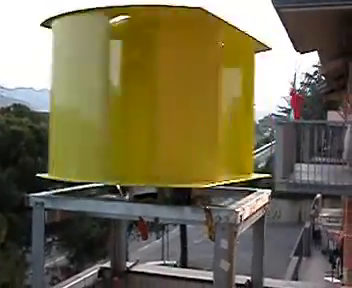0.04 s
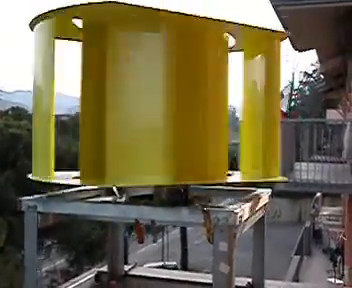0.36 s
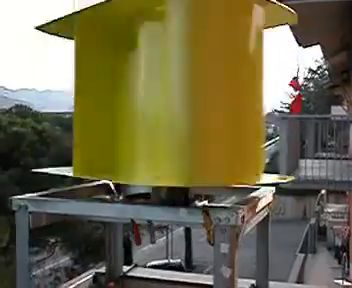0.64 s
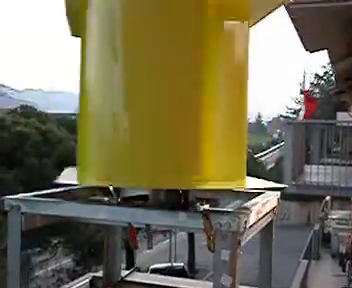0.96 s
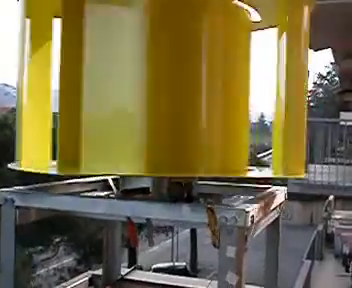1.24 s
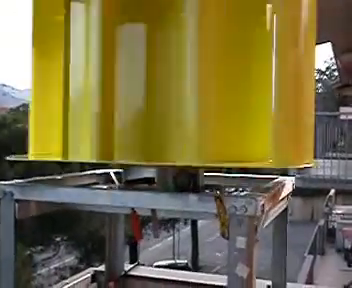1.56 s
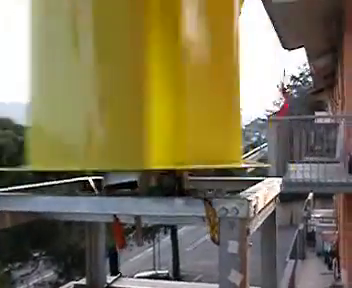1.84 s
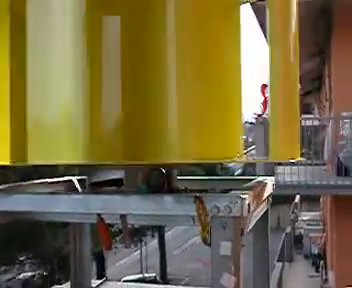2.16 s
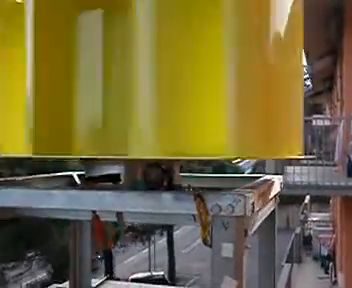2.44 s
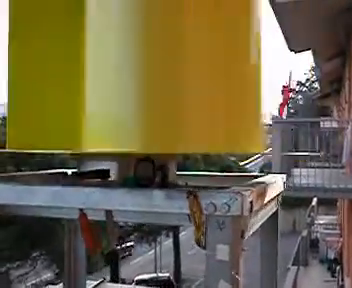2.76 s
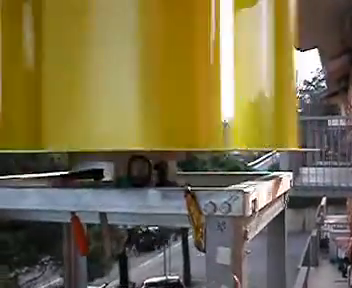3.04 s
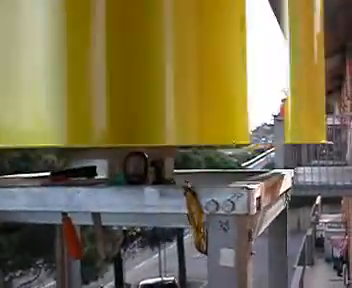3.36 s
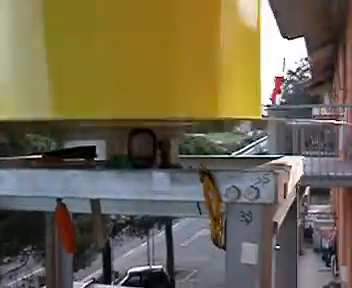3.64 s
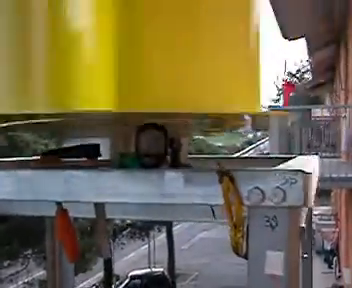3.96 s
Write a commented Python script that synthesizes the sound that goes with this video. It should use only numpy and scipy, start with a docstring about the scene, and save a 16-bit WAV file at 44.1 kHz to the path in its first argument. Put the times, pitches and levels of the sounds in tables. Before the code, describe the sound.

Wind buffets the microphone in rough bumps and slaps over a rush of road traffic.

```python
"""Air and tyres rush, heard through a small camera by a vertical turbine on a balcony above a road.
Two engines hum and fade, and a bird chirps faintly three times. Wind flutters on the microphone
and hits it in rough bumps and sharp slaps, which overload the narrow-band recorder."""
import sys
import numpy as np
from scipy.fft import rfft, irfft, next_fast_len
from scipy.io import wavfile
from scipy.ndimage import map_coordinates

SR = 44100
rng = np.random.default_rng(int(sys.argv[2]) if len(sys.argv) > 2 else 0)


def inscribe(sig):
    """Save sig as 16-bit PCM at rate SR to the path in sys.argv[1].

    A 1-D sig is mono; a 2-D sig holds one channel per row.
    Samples are clipped to [-1, 1] before scaling.
    """
    pcm = np.round(np.clip(np.atleast_2d(sig).T, -1, 1) * 32767)
    wavfile.write(sys.argv[1], SR, pcm.astype(np.int16))


N = 176400

# road noise [t/s, tyre roar level/dB, rush level/dB, roar centre f/Hz]
ROAD_TRACK = [(0, -28.5, -17.5, 1080), (.55, -24, -16, 1158), (.72, -22.5, -19, 1077),
              (.95, -20.5, -18.5, 1165), (1.4, -21, -18, 1111), (1.78, -20, -20, 1083),
              (1.92, -26.5, -24, 1053), (2.2, -26, -25, 1016), (2.7, -26, -26, 1090),
              (3.1, -29.5, -27.5, 1116), (3.45, -49, -32, 1055), (4, -42.5, -37, 1051)]
# traffic and air rush spectrum [f/Hz, relative density/dB]
RUSH_SPECTRUM = [(25, -20.5), (60, -10.5), (130, -5.5), (250, -10), (420, -1.5), (620, -6), (830, 0.5),
                 (1250, -1.5), (1450, -7.5), (1650, -8), (1900, -7), (2150, -10.5), (2600, -11.5),
                 (3200, -17.5), (3900, -19.5)]
# far traffic spectrum [f/Hz, relative density/dB]
RUMBLE_SPECTRUM = [(25, -22), (45, -3.5), (65, 3), (100, -6), (200, -24)]
# first engine's fade [t/s, level/dB]
ENGINE_FADE = [(0, -1), (.55, -0.5), (.8, -9), (1.4, -13), (2, -31.5), (4, -30)]
# its harmonics [order, relative level/dB]
ENGINE_ORDERS = [(1, -45.5), (2, -34), (4, -36), (5, -37), (6, -36.5), (7, -37.5)]
# its exhaust and whine [f/Hz, width/Hz, relative level/dB]
ENGINE_NOISE_BANDS = [(413.2, 210, -26), (1780, 200, -27)]
# second engine's note [t/s, f/Hz, level/dB]
DRONE_TRACK = [(0, 69.6, -36), (.3, 70.5, -38), (.6, 67.6, -43.5), (1, 61.6, -43.5), (1.6, 60, -46),
               (2.2, 60.3, -61.5)]
# light wind between bumps [t/s, level/dB]
BREEZE_TRACK = [(0, -33), (.55, -39), (.8, -22), (1.25, -25.5), (1.5, -30.5), (2, -33), (2.25, -34.5),
                (2.7, -30), (2.95, -29), (3.3, -24.5), (3.53, -32.5), (3.75, -26.5), (4, -33)]
# wind bumps on the microphone [centre t/s, length/s, thump level/dB, buffet level/dB]
WIND_BUMPS = [(0.124, 0.088, -21.5, -22), (0.653, 0.022, -18, -27), (0.693, 0.018, -10, -15.5),
              (0.772, 0.022, -17, -13), (0.846, 0.012, -20.5, -11), (0.903, 0.027, -24.5, -14.5),
              (1.083, 0.018, -21.5, -16), (1.28, 0.012, -21, -17.5), (1.415, .012, -24, -23.5),
              (1.562, 0.007, -18.5, -15), (1.669, 0.042, -15.5, -11.5), (1.804, 0.026, -15, -10),
              (1.833, 0.0088, -19, -3.5), (1.852, .014, -12.5, -8.5), (1.885, 0.025, -14.5, -14),
              (2.098, 0.044, -20, -23), (2.136, 0.035, -18, -18.5), (2.281, 0.013, -13, -13.5),
              (2.343, 0.031, -17, -19), (2.412, 0.011, -26.5, -24), (2.467, 0.065, -20, -22.5),
              (2.521, 0.011, -19, -22.5), (2.574, 0.022, -21, -22), (2.719, 0.014, -24, -28),
              (2.808, 0.03, -24.5, -22), (2.884, 0.021, -21, -33.5), (2.971, 0.03, -25, -24),
              (3.022, 0.02, -16.5, -15), (3.064, 0.03, -21.5, -13.5), (3.195, 0.044, -21.5, -13),
              (3.232, 0.032, -20, -11.5), (3.289, 0.054, -15.5, -17), (3.385, 0.022, -18.5, -13.5),
              (3.435, 0.04, -21.5, -18.5), (3.5, .02, -22.5, -21.5), (3.595, 0.029, -21.5, -13.5),
              (3.623, 0.018, -26.5, -10.5), (3.657, 0.04, -21, -16.5), (3.712, 0.0078, -19, -14),
              (3.755, 0.03, -22, -16.5), (3.808, 0.025, -16.5, -8.5), (3.86, 0.021, -24.5, -23),
              (3.907, 0.031, -23, -24)]
# low wind thump spectrum [f/Hz, relative density/dB]
THUMP_SPECTRUM = [(25, -35), (60, -17), (95, -6.5), (140, 0), (230, 3), (320, 2), (480, -7), (900, -25.5),
                  (2000, -50.5)]
# rough wind buffet spectrum [f/Hz, relative density/dB]
BUFFET_SPECTRUM = [(25, -28.5), (60, -34), (120, -11), (220, -8.5), (400, -1.5), (700, -0.5), (1100, -6),
                   (1500, -14.5), (2200, -27.5), (3900, -47.5)]
# wind crackle spectrum [f/Hz, relative density/dB]
CRACKLE_SPECTRUM = [(150, -21.5), (600, 5.5), (1100, 1), (1450, 3.5), (1850, 3.5), (2600, -5),
                    (3900, -28.5)]
# air slaps [centre t/s, nominal peak level/dB, pressure swing f/Hz]
AIR_SLAPS = [(0.688, 5, 560), (0.6942, -10.5, 350), (0.776, 0, 700), (.841, -2.5, 750), (.8435, -3.5, 1083),
             (.916, -8.5, 800), (1.074, -3, 650), (1.8316, 5, 750), (1.8337, 2, 600), (1.851, -4.5, 800),
             (2.2712, -5, 548), (2.2833, -1.5, 450), (2.3364, -2.5, 415), (2.3422, -7, 1790),
             (2.3524, -2.5, 419), (2.561, -7.5, 379), (2.979, -7, 400), (3.0661, 4, 500),
             (3.2365, 0.5, 550), (3.2426, -6, 1687), (3.2442, 4.5, 620), (3.2976, 0.9, 485),
             (3.3765, -2, 700), (3.380, -0.5, 793), (3.3815, -6, 2170), (3.398, -6, 600), (3.42, -11, 750),
             (3.586, -4.5, 850), (3.588, -6.5, 2166), (3.617, -2.5, 750), (3.710, -1, 600),
             (3.866, -7, 650)]
# bird chirps [start t/s, level/dB]
BIRD_CHIRPS = [(1.015, -37.5), (1.58, -37), (2.647, -40)]


def amp(db):
    """Decibels to gain."""
    return 10 ** (np.asarray(db) / 20)


def unit(x):
    """Scale to rms 1."""
    return x / np.sqrt(np.mean(x ** 2) + 1e-20)


def curves(rows):
    """One per-sample curve for each column after t/s."""
    t_s, *columns = np.transpose(rows)
    return [np.interp(np.arange(N) / SR, t_s, column) for column in columns]


def wobble(rate_hz):
    """Smooth random curve, rate_hz knots a second."""
    return map_coordinates(rng.standard_normal(8192), [np.arange(N) * rate_hz / SR], mode="wrap")


def filtered(x, response):
    """Apply the gain response(f/Hz)."""
    n_fft = next_fast_len(N + 8192)
    return irfft(rfft(x, n_fft) * response(np.fft.rfftfreq(n_fft, 1 / SR)), n_fft)[:N]


def noise(spectrum, envelope=1):
    """White noise times envelope, shaped to spectrum; rms 1."""
    f_hz, db = np.transpose(spectrum)
    white = rng.standard_normal(N) * envelope
    return unit(filtered(white, lambda hz: amp(np.interp(np.log(hz + 1), np.log(f_hz), db))))


def phase_rad(hz):
    """Running phase of a fixed or moving frequency."""
    return 2 * np.pi * np.cumsum(hz * np.ones(N)) / SR


def noise_band(centre_hz, width_hz):
    """Narrow noise about a fixed or moving centre; rms 1."""
    phase = phase_rad(centre_hz)
    lowpass = lambda hz: 1 / np.sqrt(1 + (2 * hz / width_hz) ** 6)
    in_phase = filtered(rng.standard_normal(N), lowpass)
    quadrature = filtered(rng.standard_normal(N), lowpass)
    return unit(in_phase * np.cos(phase) + quadrature * np.sin(phase))


def soft_clip(x, limit):
    """Round peaks off below limit."""
    return x / (1 + np.abs(x / limit) ** 6) ** (1 / 6)


def road(roar_width_hz=220, wander_hz=30, rumble_db=-41):
    """Tyres roar in one wandering band over a rush of traffic and air and a steady far rumble."""
    roar_db, rush_db, centre_hz = curves(ROAD_TRACK)
    roar_gain = amp(roar_db + 1.3 * wobble(26))
    roar = roar_gain * noise_band(centre_hz + wander_hz * wobble(9), roar_width_hz)
    rush = amp(rush_db + 0.15 * wobble(15)) * noise(RUSH_SPECTRUM)
    return roar + rush + amp(rumble_db) * noise(RUMBLE_SPECTRUM)


def engine(fundamental_hz=61.7):
    """A vehicle's slightly unsteady hum, exhaust and whine fade together."""
    level_db, = curves(ENGINE_FADE)
    phase = phase_rad(fundamental_hz * (1 + .008 * wobble(4.9)))
    hum = sum(amp(db + 0.7 * wobble(7.1)) * unit(np.sin(order * phase)) for order, db in ENGINE_ORDERS)
    bands = sum(amp(db) * noise_band(hz, width_hz) for hz, width_hz, db in ENGINE_NOISE_BANDS)
    return amp(level_db) * (hum + bands)


def engine_drone():
    """A second engine's low, clean note sinks and fades."""
    hz, level_db = curves(DRONE_TRACK)
    return amp(level_db + wobble(5.1)) * unit(np.sin(phase_rad(hz)))


def wind_flutter(bump_steepness=2.25, strong_bump_db=-12, strong_crackle_db=-20):
    """Eddies strike the microphone in spurts: soft bumps thump, hard ones also crackle."""
    t_s = np.arange(N) / SR
    breeze_power = amp(curves(BREEZE_TRACK)[0] + 1.7 * wobble(24)) ** 2
    thump_power, buffet_power = amp(0.5) ** 2 * breeze_power, breeze_power.copy()
    for centre_s, length_s, thump_db, buffet_db in WIND_BUMPS:
        swell = .5 ** (np.abs(2 * (t_s - centre_s) / length_s) ** bump_steepness)
        thump_power += amp(thump_db) ** 2 * swell
        buffet_power += amp(buffet_db) ** 2 * swell
    force = np.sqrt(buffet_power)
    eddies = wobble(330)
    thump = np.sqrt(thump_power) * noise(THUMP_SPECTRUM)
    buffet = force * noise(BUFFET_SPECTRUM, envelope=amp(3.0 * eddies))
    crackle_gain = amp(strong_crackle_db) * (force / amp(strong_bump_db)) ** 1.44
    crackle = crackle_gain * noise(CRACKLE_SPECTRUM, envelope=amp(5.5 * eddies))
    return thump + buffet + crackle


def with_slaps(flutter, half_length_cycles=0.42, grit_gain=0.19):
    """Eddies burst on the microphone port: each sudden suction briefly displaces the flutter."""
    out = flutter.copy()
    offsets = np.arange(-256, 256)
    t_s = offsets / SR
    grit = grit_gain * noise(CRACKLE_SPECTRUM)
    for centre_s, db, hz in AIR_SLAPS:
        at = round(centre_s * SR) + offsets
        burst = np.exp(-(t_s * hz / half_length_cycles) ** 2)
        swing = -np.cos(2 * np.pi * hz * t_s) + grit[at]
        out[at] = (1 - burst) * out[at] + burst * amp(db) * swing
    return out


def bird(chirp_s=.095, start_hz=3700, end_hz=3090):
    """Thin, slightly hoarse whistles slide down and level off."""
    out, n = np.zeros(N), int(chirp_s * SR)
    progress = np.linspace(0, 1, n)
    hz = end_hz + (start_hz - end_hz) * (1 - progress) ** 1.5
    chirp = np.exp(2j * np.pi * np.cumsum(hz) / SR) * np.sin(np.pi * progress ** .7)
    for start_s, db in BIRD_CHIRPS:
        jitter_rad = .5 * wobble(240)[:n]
        out[round(start_s * SR):][:n] += amp(db) * np.real(chirp * np.exp(1j * jitter_rad))
    return out * amp(1.2 * wobble(120))


def scene():
    """Mono sum at the microphone."""
    wind = with_slaps(soft_clip(wind_flutter(), limit=.76))
    return (wind + road() + engine() + engine_drone() + bird())[None]


def record(dry, sampling_hz=7875, smoothing_hz=3986, stop_hz=5000, top_hz=15800):
    """Overload rounds the peaks; a low sampling rate cuts the treble and mirrors the band's top."""
    x = soft_clip(dry[0], limit=.95)
    x = filtered(x, lambda hz: hz < sampling_hz / 2)
    x = x * (1 + 2 * np.cos(2 * np.pi * sampling_hz * np.arange(N) / SR))  # mirror images
    x = filtered(x, lambda hz: (hz < stop_hz) / np.sqrt(1 + (hz / smoothing_hz) ** 36))
    x = np.clip(x, -.88, None)  # deepest troughs clip with a tick
    return filtered(x, lambda hz: hz < top_hz)[None]


dry = scene()
out = record(dry)
inscribe(out)
```